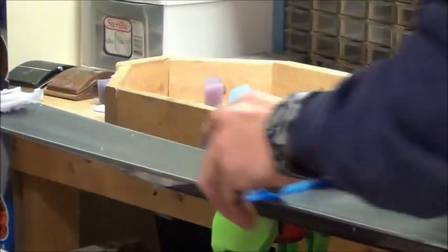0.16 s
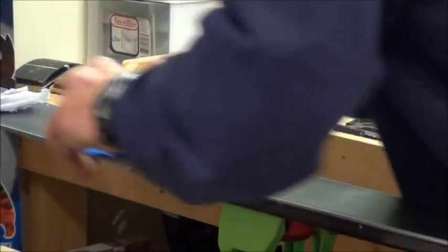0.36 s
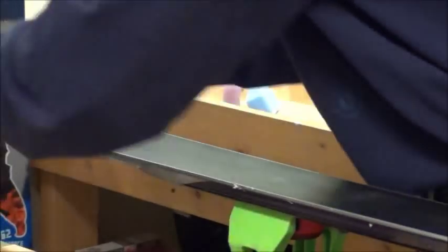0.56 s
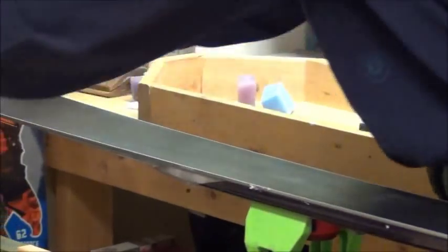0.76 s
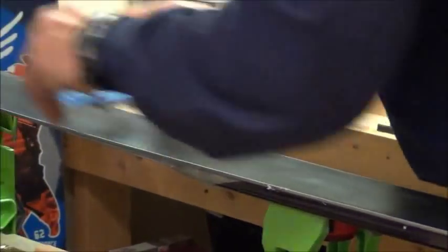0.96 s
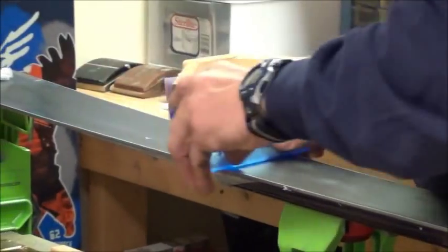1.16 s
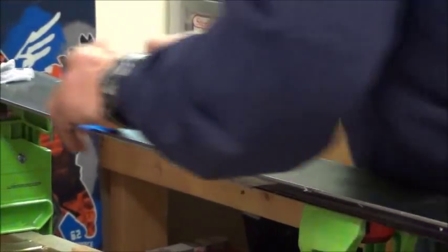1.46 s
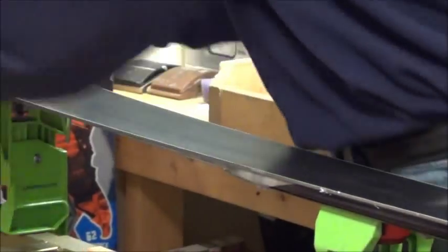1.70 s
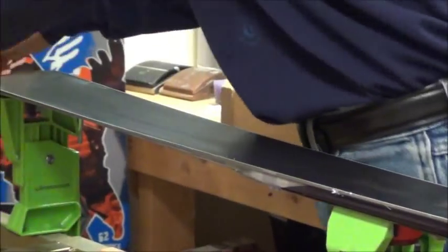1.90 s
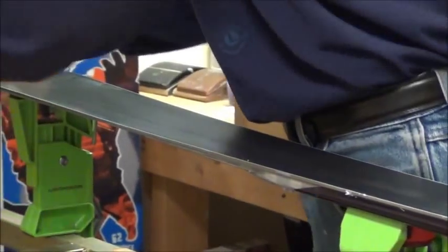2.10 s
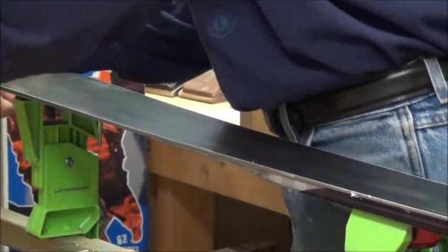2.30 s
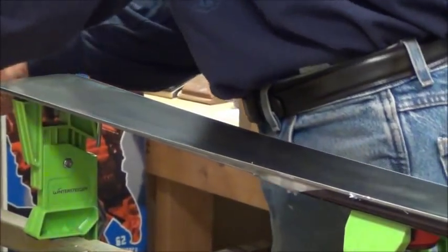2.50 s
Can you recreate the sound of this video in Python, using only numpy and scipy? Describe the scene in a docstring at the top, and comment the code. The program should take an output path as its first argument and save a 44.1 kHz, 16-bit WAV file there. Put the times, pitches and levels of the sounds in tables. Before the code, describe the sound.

A plastic scraper hisses twice along a waxed ski, then snaps off with a clack.

```python
"""In a small workshop, a plastic scraper is drawn twice along a waxed ski clamped to a workbench.
Each stroke is a hiss of countless wax chips breaking, with a squeak or two as the blade catches.
The second stroke ends with the blade snapping off the ski, which rings. Around the strokes the
blade brushes the ski's base, a hand rubs the ski, and blade and ski knock lightly on the bench."""
import sys
import numpy as np
from scipy import signal
from scipy.fft import rfft, irfft
from scipy.io import wavfile
from scipy.ndimage import uniform_filter1d

SR = 44100
rng = np.random.default_rng(int(sys.argv[2]) if len(sys.argv) > 2 else 0)


def persist_wave(psi):
    """Save psi, clipped to +-1, as 16-bit WAV."""
    counts = np.round(np.clip(psi, -1, 1) * 32767).astype(np.int16)
    wavfile.write(sys.argv[1], SR, np.atleast_2d(counts).T)


N = 116865
T = np.arange(N) / SR

# The tone of breaking wax. Each row: frequency in Hz, level in dB.
WAX_HISS = [(2900, -26), (4300, -6), (7100, -4), (8700, -0.5), (12000, -1.5), (13300, -7.5), (15700, -11),
            (16000, -27)]
# Where the blade rings. Each row: frequency in Hz, width in Hz, boost in dB.
BLADE_PEAKS = [(9400, 740, 2)]


def amp(db):
    """Turns decibels into a multiplier."""
    return 10 ** (np.asarray(db) / 20)


def evened(x):
    """Scales a signal to an average strength (rms) of 1."""
    return x / np.sqrt(np.mean(x ** 2) + 1e-20)


def look_up(points, hz):
    """Reads between a table's rows, on a scale of octaves."""
    f, value = np.transpose(points)
    return np.interp(np.log(hz + 1), np.log(f + 1), value)


def add(mix, start, sound):
    """Mixes a sound in at a start time in seconds."""
    part = mix[max(round(start * SR), 0):][:len(sound)]
    part += sound[:len(part)]


def colour(x, tone, peaks=()):
    """Gives a steady sound a tone and ringing peaks, at strength 1."""
    hz = np.fft.rfftfreq(x.shape[-1], 1 / SR)
    db = look_up(tone, hz) + sum(boost / (1 + (2 * (hz - f) / width) ** 2) for f, width, boost in peaks)
    return evened(irfft(rfft(x) * amp(db), x.shape[-1]))


def band_noise(centre_hz, spread_hz):
    """Noise that fades away on both sides of one pitch, at strength 1."""
    hz = np.fft.rfftfreq(N, 1 / SR)
    return evened(irfft(rfft(rng.standard_normal(N)) / (1 + ((hz - centre_hz) / spread_hz) ** 4), N))


def swell(start, length):
    """A rounded rise and fall."""
    return np.sqrt(abs(np.sin(np.pi * np.clip((T - start) / length, 0, 1))))


def ring(notes, t, wavers_per_s=50):
    """A struck object's own notes, each wavering as it dies."""
    out, steps = np.zeros(len(t)), np.arange(200)
    for hz, db, fade_s in notes:
        a, b = rng.standard_normal((2, len(steps)))
        waver = 1 + .55 * np.interp(t * wavers_per_s, steps, a + 1j * b)
        wave = np.exp(2j * np.pi * (hz * t + rng.random()))
        out += np.sqrt(2) * amp(db - 60 * t / fade_s) * (waver * wave).real
    return out


def chips(per_s=30000, spread_db=1.5, drift_db=1):
    """Wax breaks in a dense crackle whose tone drifts slowly."""
    clicks = rng.standard_normal(N) * (rng.random(N) < per_s / SR)
    clicks *= amp(spread_db * rng.standard_normal(N))
    spectrum = signal.stft(clicks, nperseg=512)[2]
    drift = uniform_filter1d(rng.standard_normal(spectrum.shape), size=8, axis=0)
    drift = evened(uniform_filter1d(drift, size=22, axis=1))
    return signal.istft(spectrum * amp(drift_db * drift), nperseg=512)[1][:N]


def sliding(tone, passes):
    """A light touch on the wax: crackle that swells with each pass."""
    return colour(chips(), tone) * sum(amp(db) * swell(start, length) for start, length, db in passes)


def room_air():
    """The workshop's quiet, low background noise."""
    # Each row: frequency in Hz, level in dB.
    tone = [(30, -20), (70, 6.5), (170, -10.5), (450, -4), (2000, -15), (5000, -23.5)]
    middle, side = colour(rng.standard_normal((2, N)), tone)
    return amp(-43) * stereo(middle, amp(-4) * side)


def blade_brushes():
    """The blade brushes the ski lightly and brightly on its way back."""
    # Each row: frequency in Hz, level in dB.
    tone = [(150, 3), (500, 9), (1500, 7), (7000, 5.5), (11000, 7), (16000, -10)]
    # Each row: start in seconds, length in seconds, level in dB.
    passes = [(0.0, 0.13, -46.5), (0.899, 0.043, -35.5), (1.093, 0.18, -41), (1.188, 0.096, -31.5),
              (2.116, 0.039, -47.5)]
    return sliding(tone, passes)


def knocks():
    """Each knock is a short rattle, a round note from the struck spot, and the ring of the bench."""
    # Each row: start in seconds, rattle time in seconds, the spot's pitch in Hz, then dB for each band.
    blows = [(0.123, 0.015, 396, -50, -35.5, -32, -41.5, -44),
             (0.650, 0.0091, 325, -29, -21, -40.5, -51, -38),
             (0.968, 0.017, 268, -29.5, -32, -30.5, -29, -38),
             (1.195, 0.012, 560, -38, -32, -29.5, -46, -35), (1.555, 0.018, 77, -37, -29, -33, -65, -50),
             (1.722, 0.011, 900, -44.5, -29, -33, -20, -57),
             (2.17, 0.0079, 10300, -71, -56, -43, -46, -38.5),
             (2.196, 0.025, 348, -35.5, -29, -45, -77, -67), (2.223, 0.016, 166, -34, -33.5, -57, -74, -70),
             (2.294, 0.0095, 3580, -57, -39, -36, -39.5, -36),
             (2.361, 0.0095, 9700, -56, -35, -25, -27.5, -29.5),
             (2.365, 0.0094, 465, -21, -26, -23, -34.5, -42), (2.474, 0.02, 397, -30, -37, -45.5, -53, -51)]
    # The centres of those five bands in Hz.
    bands = [80, 330, 1000, 2900, 9500]
    # Notes of the ski clamped to the bench. Each row: pitch in Hz, level in dB, seconds to fade 60 dB.
    bench_notes = [(73.7, -1.5, 0.25), (129, -6, 0.27), (172, -4, 0.28), (230, -7, 0.26), (300, -3, 0.25),
                   (368, -7, 0.25), (443, -3, 0.17), (545, -1, 0.19), (895, -6, .18)]
    out, t = np.zeros(N), np.arange(SR // 2) / SR
    hz = np.fft.rfftfreq(len(t), 1 / SR)
    tilt = np.sqrt(SR / 2 / (hz + 1)) * hz ** 4 / (hz ** 4 + 50 ** 4)  # favours lows, down to 50 Hz
    bass = 1 / (1 + (hz / 1500) ** 2)
    slow_rise, fast_rise = 1 - np.exp(-t / 0.0061), 1 - np.exp(-t / 0.00044)  # treble arrives first
    for start, rattle_s, spot_hz, *levels in blows:
        spot_boost_db = 4 * np.exp(-(np.log2((hz + 1) / spot_hz) / 0.59) ** 2)
        blow_db = look_up(list(zip(bands, levels)), hz) + spot_boost_db
        spectrum = np.sqrt(len(t)) * np.exp(2j * np.pi * rng.random(len(hz))) * tilt * amp(blow_db)
        rattle = slow_rise * irfft(spectrum * bass) + fast_rise * irfft(spectrum * (1 - bass))
        rattle *= np.exp(-t / (2 * rattle_s))
        bench = ring([(f, db + np.interp(f, hz, blow_db), fade) for f, db, fade in bench_notes], t)
        decay = spot_hz * t / 3.96  # the spot rings for a few cycles, falling in pitch
        cycles = np.cumsum(spot_hz * (1 + 0.23 * np.exp(-2 * decay))) / SR
        spot_level = amp(1 + np.interp(spot_hz, hz, blow_db)) * fast_rise * np.exp(-decay)
        spot = spot_level * np.sin(2 * np.pi * cycles)
        add(out, start, amp(3.5) * rattle + spot + amp(1.5) * slow_rise * bench)
    return out


def scraping():
    """Breaking chips shake the blade into a hiss and a lower rasp; it sings as it digs in and bends."""
    # One list per stroke. Each row: time in seconds, hiss level in dB, rasp level in dB.
    strokes = [
        [(0.195, -35, -35), (0.275, -17, -26.5), (0.46, -13, -26), (0.545, -12, -21.5), (0.585, -13, -30),
         (0.66, -16, -23), (0.765, -25.5, -21.5), (0.82, -43, -34.5)],
        [(1.335, -37, -34), (1.385, -23, -29), (1.47, -16.5, -28), (1.575, -11, -24.5), (1.68, -13, -23.5),
         (1.775, -12.5, -25)],
    ]
    # Each row: frequency in Hz, level in dB.
    rasp_tone = [(60, 0), (180, -9), (520, -9), (1050, -10), (1900, 0), (4200, 1.5), (8000, -5.5),
                 (16000, -47)]
    land_db_per_s, lift_db_per_s = 495, 750
    bend_from_hz, bend_to_hz, bend_s = 4000, 5732, .26  # one blade note climbs as it bends
    hiss = colour(chips(), WAX_HISS, BLADE_PEAKS)
    rasp = colour(chips(), rasp_tone, BLADE_PEAKS)
    out = np.zeros(N)
    for stroke in strokes:
        times, hiss_db, rasp_db = np.transpose(stroke)
        before, age, after = np.maximum([times[0] - T, T - times[0], T - times[-1]], 0)
        contact = amp(-land_db_per_s * before - lift_db_per_s * after)
        edge_note = amp(-7.5 - 18 * age) * band_noise(2233, spread_hz=214)
        climb_hz = (bend_to_hz - bend_from_hz) * np.minimum(age / bend_s, 1)
        climb = np.exp(2j * np.pi * np.cumsum(climb_hz) / SR)
        bend_note = amp(-14) * (signal.hilbert(band_noise(bend_from_hz, spread_hz=428)) * climb).real
        high = (hiss + bend_note) * amp(np.interp(T, times, hiss_db))
        low = (rasp + edge_note) * amp(np.interp(T, times, rasp_db))
        out += contact * (high + low)
    return out


def skipping(skips_per_s=297.5):
    """At full pressure the blade skips in tiny uneven jumps, each a sharp tick."""
    jumps = np.cumsum(skips_per_s * (1 + band_noise(0, skips_per_s) / 2)) / SR
    ticks = rng.standard_normal(N) * np.exp(-10 * (jumps % 1))
    return amp(-16) * swell(start=0.5, length=0.066) * colour(ticks, WAX_HISS, BLADE_PEAKS)


def squeaks():
    """The blade's edge sticks and slips briefly near the end of a stroke."""
    # Each row: start in seconds, length in seconds, pitch in Hz, spread in Hz, level in dB.
    catches = [(0.694, 0.053, 1625, 48.8, -23), (0.745, 0.063, 1250, 523, -29),
               (1.711, 0.042, 1340, 660, -17.5)]
    return sum(amp(db) * swell(start, length) ** 2 * band_noise(hz, spread)
               for start, length, hz, spread, db in catches)


def hand_rubs():
    """A hand slides along the ski with a soft, dull sound."""
    # Each row: frequency in Hz, level in dB.
    tone = [(300, -1), (1100, -10), (6000, -30)]
    # Each row: start in seconds, length in seconds, level in dB.
    passes = [(0.786, 0.13, -33.5), (0.892, 0.12, -31), (2.597, 0.062, -33.5)]
    return sliding(tone, passes)


def snap(start=1.797, hold_s=0.058):
    """The blade slips off with a hard clack and chatters; the freed ski swings and buzzes faintly."""
    # The chatter's tone. Each row: frequency in Hz, level in dB.
    tone = [(80, 2.5), (1100, -1.5), (2650, 1), (3700, 1), (4800, -8), (6600, -14), (11500, -14.5),
            (16000, -28)]
    # Where the freed blade rings. Each row: frequency in Hz, width in Hz, boost in dB.
    peaks = [(2570, 120, 3), (5430, 260, 9.5)]
    # Notes of the freed ski. Each row: pitch in Hz, level in dB, seconds to fade 60 dB.
    ski_notes = [(91, -14, .48), (111, -15, 0.36), (159, -23, .46), (232, -25, 0.38), (375, -30, .5),
                 (621, -21, 0.28)]
    clack = amp(-13.5 - 280 * T) * band_noise(peaks[0][0], spread_hz=480)
    chatter_level = amp(-11.5 - 75 * T - 270 * np.maximum(T - hold_s, 0))
    buzz_level = amp(-24 - 99 * T)
    slap = 1 + 0.36 * np.cos(2 * np.pi * ski_notes[0][0] * T)  # the chatter follows the ski's swing
    chatter = slap * np.hypot(chatter_level, buzz_level) * colour(rng.standard_normal(N), tone, peaks)
    swing_time = np.cumsum(1 + 0.1203 * np.exp(-T / hold_s)) / SR  # the notes start 12% high
    build_up = 1 - np.exp(-(T / 0.027) ** 2)
    out = np.zeros(N)
    add(out, start, clack + chatter + build_up * ring(ski_notes, swing_time))
    return out


def stereo(middle, side, corner_hz=400):
    """Makes left and right, which differ less in the bass."""
    side = 0.41 * signal.lfilter(*signal.butter(1, corner_hz, "high", fs=SR), side) + .11 * side
    return np.array([middle + side, middle - side])


def room(x, echo_db, low_hz=260):
    """Adds the workshop's dense echoes; treble dies first and the bass stays mostly direct."""
    # Each row: frequency in Hz, seconds to fade 60 dB.
    fade_times = [(700, 0.37), (5000, 0.26), (10000, 0.25), (16000, 0.19)]
    echoes = rng.standard_normal((2, SR // 2)) * (rng.random((2, SR // 2)) < .1)
    echoes[:, :round(.002 * SR)] = 0
    hz, t, spectrum = signal.stft(echoes, SR, nperseg=256)
    tail = signal.istft(spectrum * amp(-60 * t / look_up(fade_times, hz)[:, None]), SR, nperseg=256)[1]
    tail /= np.linalg.norm(tail[0])
    middle, side = amp(echo_db) * signal.fftconvolve(x[None], tail, axes=1)[:, :N]
    middle = signal.lfilter(*signal.butter(1, low_hz, "high", fs=SR), middle)
    return stereo(x + middle, side) / np.sqrt(1 + amp(echo_db) ** 2)


def travelling(x, echo_db, count=8, step_s=.022):
    """A sound moving along the ski passes from one set of echoes to the next."""
    shares = [np.clip(1 - abs((T / step_s - k) % count - 1), 0, 1) for k in range(count)]
    return sum(room(x * share, echo_db) for share in shares)


def scene():
    """Blade, hand, ski and bench in the workshop, over its quiet air."""
    air = room_air()
    moving = scraping() + skipping() + blade_brushes() + hand_rubs() + squeaks()
    return travelling(moving, echo_db=-1) + room(knocks() + snap(), echo_db=-4.5) + air


def record(dry, low_hz=40, top_hz=15900, lean_db=.6):
    """Cuts the deepest bass, leans slightly left, then cuts the highest treble."""
    trimmed = signal.lfilter(*signal.butter(4, low_hz, "high", fs=SR), dry)
    leaned = trimmed * amp([[lean_db / 2], [-lean_db / 2]])
    treble_cut = signal.firwin(511, top_hz, window=("kaiser", 9), fs=SR)
    return signal.oaconvolve(leaned, treble_cut[None], "same")


dry = scene()
out = record(dry)
persist_wave(out)
```